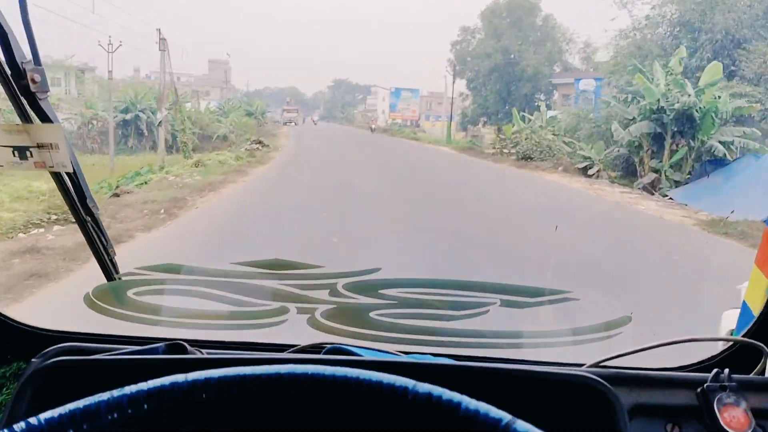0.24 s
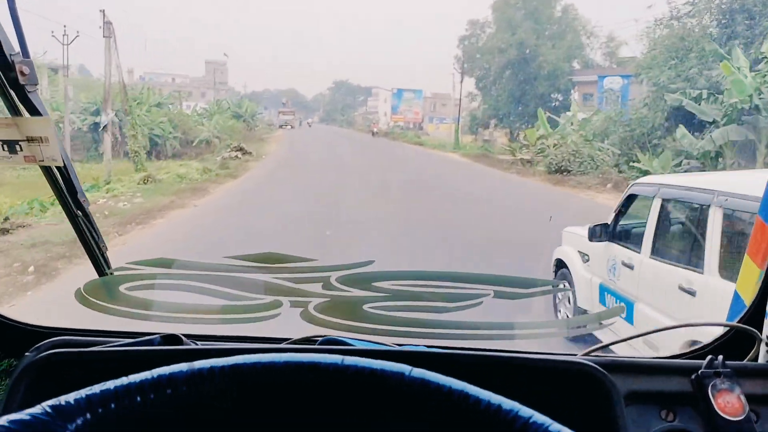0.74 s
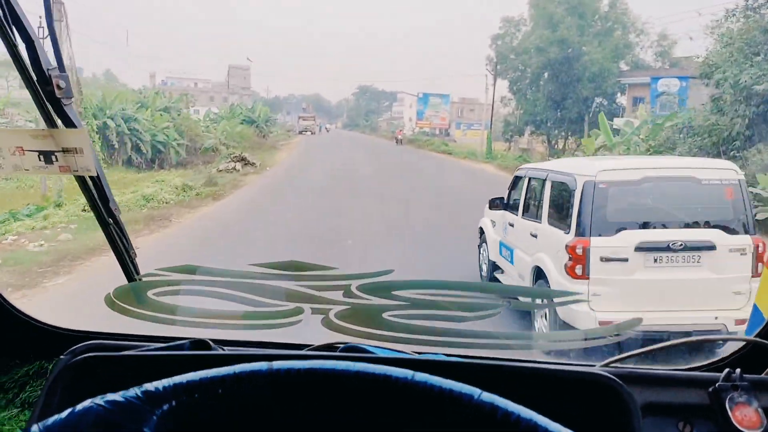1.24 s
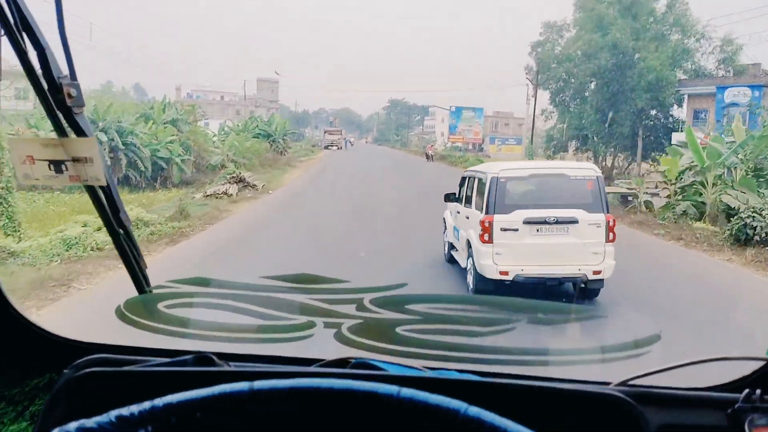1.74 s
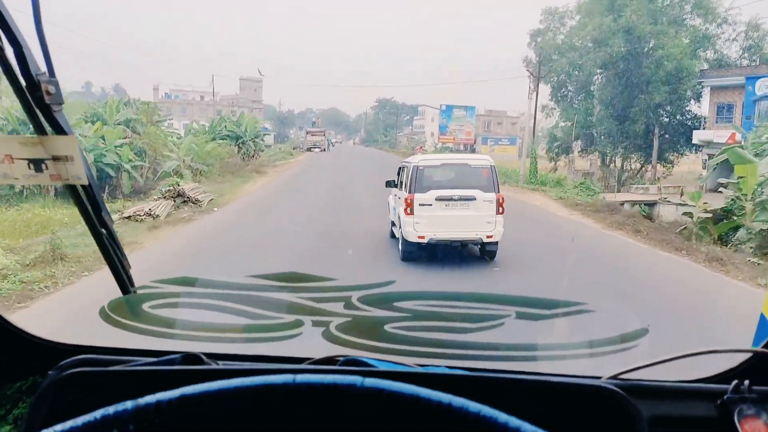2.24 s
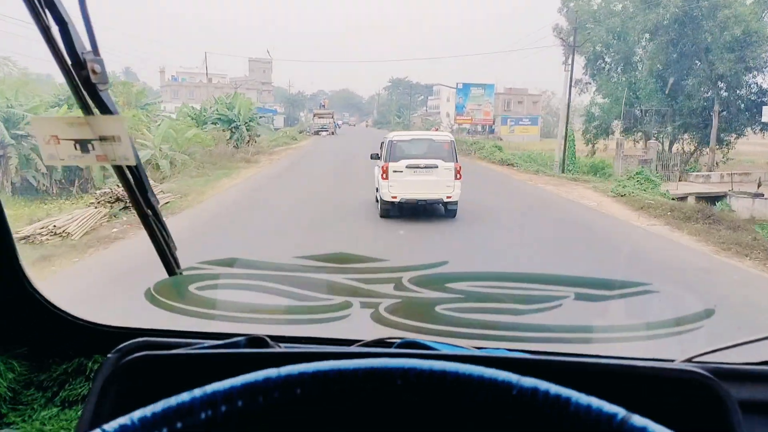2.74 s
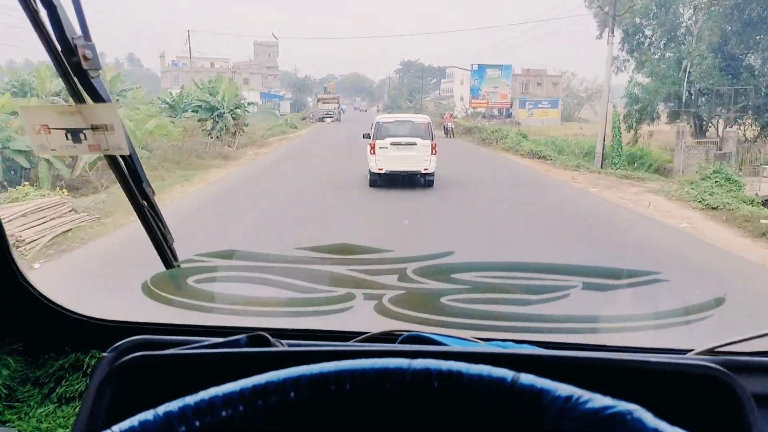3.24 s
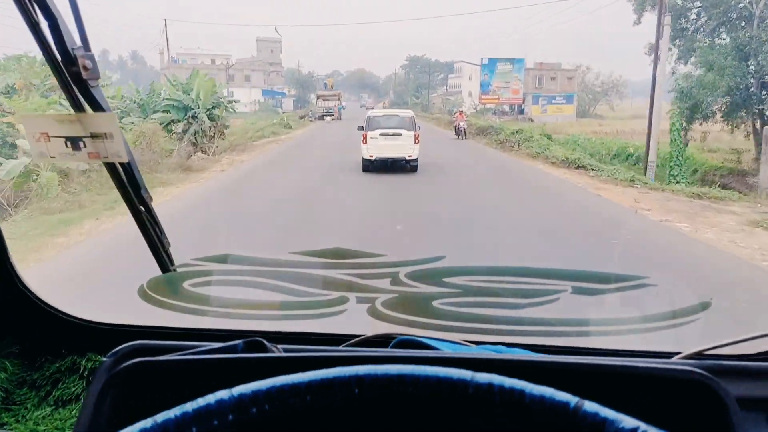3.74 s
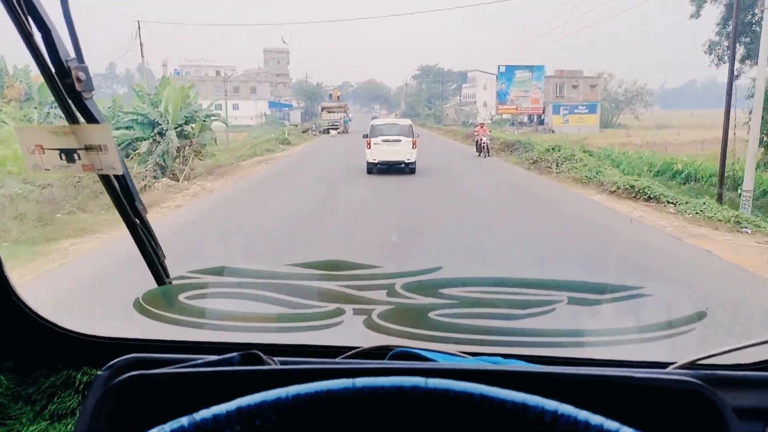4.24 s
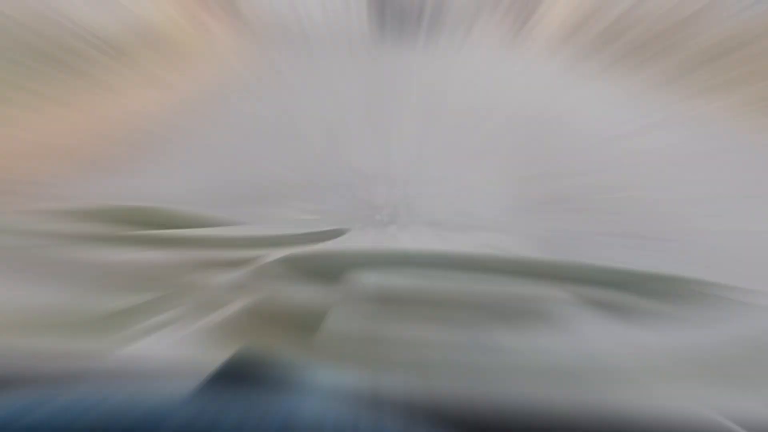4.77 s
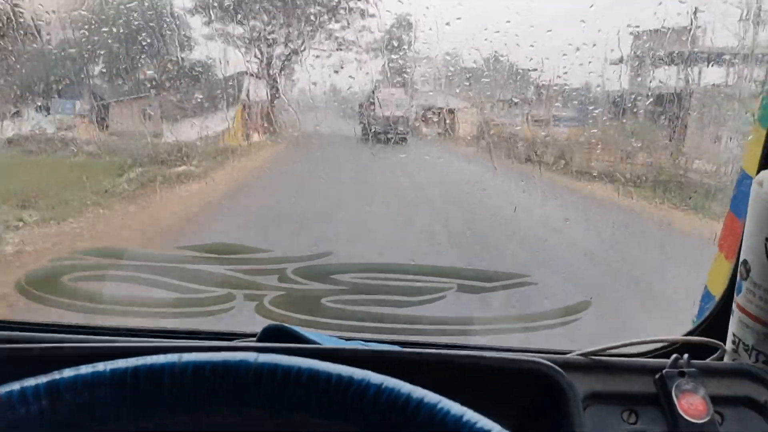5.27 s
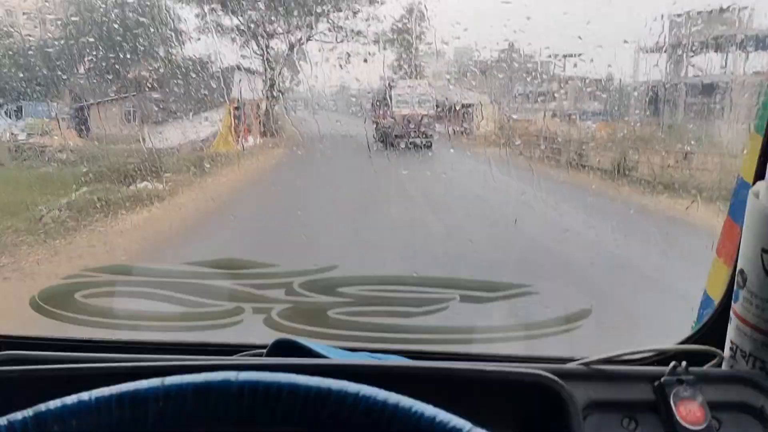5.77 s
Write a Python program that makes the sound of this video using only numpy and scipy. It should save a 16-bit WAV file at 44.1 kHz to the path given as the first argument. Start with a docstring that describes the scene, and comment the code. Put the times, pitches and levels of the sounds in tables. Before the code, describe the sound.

Low engine drone and bassy road noise fill a moving truck's cab while fittings jingle at every jolt; sound drops out for half a second near the end.

```python
"""A rough hum and rattle inside the cab of a truck cruising at steady revs.
Road rumble, boom and roar are shaped noise; the engine is a set of sine tones locked to the crankshaft.
Loose metal fittings on the right rattle in bursts at every jolt: random knocks make them ring and tick.
Near the end the sound drops out for half a second and returns a little louder, the engine slightly slower."""
import sys
import numpy as np
from scipy import signal
from scipy.fft import rfft, irfft, next_fast_len
from scipy.io import wavfile
from scipy.ndimage import uniform_filter1d

SR = 44100
rng = np.random.default_rng(int(sys.argv[2]) if len(sys.argv) > 2 else 0)


def put_to_file(sound):
    """Save the sound as 16-bit audio at rate SR, in the file named by the first command-line argument."""
    columns = np.atleast_2d(sound).T  # one column per channel
    safe = np.clip(columns, -1, 1)
    whole_steps = np.round(safe * 32767)
    wavfile.write(sys.argv[1], SR, whole_steps.astype(np.int16))


N = 264996

# Level of the road rumble over time: time_s, level_db
RUMBLE_LEVEL = [(0, -19.5), (.32, -20), (.55, -21), (.85, -14.5), (1.0, -21), (1.5, -28), (1.93, -18),
                (2.12, -24), (2.6, -26), (2.72, -17), (2.89, -24), (3.0, -23), (3.12, -22), (3.2, -22),
                (3.5, -20), (3.65, -26), (4.1, -18.5), (4.3, -17.5), (4.41, -28.5), (4.5, -17.5),
                (4.6, -21), (4.82, -25), (4.95, -17.5), (5.51, -17), (5.6, -17), (5.75, -32), (6.0, -26)]
# Level of the road roar, also followed by the boom: time_s, level_db
ROAR_LEVEL = [(0, -23), (.3, -22), (.8, -22.5), (1.45, -25), (2.2, -23.5), (3.0, -23.5), (3.9, -24),
              (4.25, -23), (4.95, -24), (5.51, -19), (5.7, -19.5), (6.0, -21)]
# Noise colours, in relative level: pitch_hz, level_db (per Hz)
RUMBLE_COLOUR = [(6, -28.5), (17, -1), (24, 6), (33, 9.5), (44, 0.5), (54, -9.5), (75, -32), (300, -100)]
BOOM_COLOUR = [(10, -56.5), (35, -23), (55, 2), (75, 5), (115, 5.5), (150, 6.5), (180, -1.5), (195, -13),
               (260, -34), (1000, -87)]
ROAR_COLOUR = [(60, -50.5), (130, -14.5), (200, 0), (330, -3), (520, -14), (820, -12.5), (1500, -13.5),
               (1700, -12), (3000, -15.5), (5000, -26), (7000, -30.5), (9000, -37), (16000, -41.5)]
CLATTER_COLOUR = [(500, -61), (1200, -19.5), (2000, 4.5), (3000, -5.5), (3500, -3.5), (5500, 0.5),
                  (6500, -2.5), (7300, -13), (8500, -28), (12000, -56)]
TICKING_COLOUR = [(3000, -47), (5500, -19.5), (7500, 1), (8700, 2.5), (9800, -2), (11500, -2), (13200, -1),
                  (14500, -13.5), (15700, -6)]
# Air and panel resonances of the cab: pitch_hz, width_hz, lift_db (negative is a dip)
CAB_RESONANCES = [(343, 25, -7), (441, 82, 11), (636, 152, 8.5), (830, 53, -3.5), (987, 190, 7.5),
                  (1263, 237, 6.5), (1432, 59, 7)]
# How alike left and right are: pitch_hz, likeness (1 same, 0 unrelated, -1 opposite)
LIKENESS = [(20, 0.98), (60, 1), (130, 0.94), (220, 0.87), (340, 0.88), (460, 0.86), (600, 0.42),
            (750, .25), (1100, -0.00069), (1500, -0.21), (3100, 0.071), (15000, -0.97)]
# Left level minus right level added by panning: pitch_hz, left_right_db
ROAR_PAN = [(200, -3.5), (380, 2), (700, -2.5), (1300, -1.5), (3000, -4.5)]
CLATTER_PAN = [(1500, -4), (2500, -9), (5000, -7), (8000, -3), (10000, -1), (15000, -.6)]
# Crankshaft speed: time_s, speed_turns_per_s
CRANK_SPEED = [(0, 19.72), (.5, 19.68), (.9, 19.76), (1.9, 19.82), (3.7, 19.84), (4.3, 19.75),
               (4.96, 19.73), (5.5, 19.3), (6.01, 19.3)]
# Engine and driveline orders: multiple (of crankshaft speed)
ORDER_MULTIPLE = [1, 3, 5, 6, 7, 8.23, 10, 12, 14, 16.5, 18, 21, 36]
# Average level of each order, one row per multiple: before_gap_db (rms), after_gap_db (rms)
ORDER_LEVEL = [(-36.5, -22), (-24, -20.5), (-37, -40), (-32.5, -43), (-20.5, -17), (-34.5, -25.5),
               (-45.5, -39), (-35.5, -57), (-42.5, -38.5), (-44, -37), (-43, -53), (-44.5, -44), (-45, -39)]
# Strength of the steady shaking between jolts: time_s, light_parts_db, heavy_parts_db, ticking_db
SHAKING = [(0, -26, -26, -45), (.3, -31, -28, -49), (.75, -24, -29, -44), (1.1, -30, -29, -47),
           (1.33, -38, -34, -58), (1.7, -38, -38, -55), (2.05, -36, -33, -60), (2.4, -31, -32, -51),
           (2.83, -31, -27, -52), (3.2, -32, -30, -52), (3.5, -29, -29, -48), (4.07, -31, -31, -52.5),
           (4.4, -26, -28, -45.5), (4.95, -30.5, -30, -49), (5.51, -34, -29, -54.5), (6.0, -35, -32, -51)]
# Peak strength of the shaking added by each jolt: start_s, light_parts_db, heavy_parts_db, ticking_db
JOLTS = [(0.0334, -23.5, -24.5, -42), (0.1114, -24, -30.5, -45.5), (0.1634, -37, -36, -44),
         (0.1944, -26.5, -34, -49), (0.2294, -28, -29, -51), (0.286, -18, -22.5, -44.5),
         (0.3464, -21, -25.5, -38.5), (0.3904, -25, -29.5, -39), (0.4354, -34.5, -34, -40.5),
         (0.5214, -25, -31, -45), (0.6004, -23, -27.5, -36.5), (0.6444, -28, -27, -40.5),
         (0.6834, -24.5, -26, -41.5), (0.7594, -27, -27.5, -42), (0.8154, -28, -26.5, -38),
         (0.8864, -27, -29, -47.5), (0.9774, -23, -35.5, -46.5), (1.0294, -30.5, -33, -45),
         (1.0644, -26, -28, -45), (1.1334, -27, -34, -41), (1.2004, -25, -33, -45),
         (1.2504, -28.5, -41, -50), (1.3614, -28, -31, -47), (1.3884, -29, -34, -43),
         (1.4354, -30, -41.5, -48), (1.5115, -24, -30, -44), (1.5744, -28.5, -27.5, -43),
         (1.6264, -25, -27.5, -46), (1.6614, -35, -30, -48), (1.7214, -29.5, -39, -51),
         (1.7514, -35.5, -31, -47), (1.8244, -22, -28, -42.5), (1.871, -25, -28, -41),
         (1.9144, -33, -33, -52), (1.9744, -32, -32, -57), (2.0294, -33, -33, -43.5),
         (2.1334, -20, -28, -40), (2.2054, -25.5, -24, -45), (2.2654, -27.5, -29, -44),
         (2.3204, -25, -26, -40), (2.3784, -27, -29, -46), (2.453, -26, -27, -43),
         (2.5074, -34, -36.5, -48), (2.5814, -28, -31, -46.5), (2.6254, -26.5, -29, -41),
         (2.7067, -28.5, -35, -47), (2.743, -24, -26, -43), (2.8584, -25.5, -28, -44),
         (2.945, -21, -25.5, -41), (2.997, -26, -31, -43), (3.041, -27, -29.5, -44),
         (3.0979, -27, -30.5, -45.5), (3.137, -25.5, -23, -41.5), (3.2167, -21, -18, -45),
         (3.2674, -31, -37, -44.5), (3.3014, -25.5, -27.5, -42), (3.3694, -27, -24, -43),
         (3.4104, -29.5, -30, -46.5), (3.4364, -22, -26.5, -44), (3.4894, -24.5, -27, -42.5),
         (3.5564, -25.5, -29, -42), (3.6044, -26.5, -34.5, -43.5), (3.68, -25.5, -29.5, -47.5),
         (3.7214, -24.5, -27.5, -40.5), (3.7594, -25, -27, -39), (3.808, -22.5, -28.5, -43),
         (3.866, -26.5, -29, -40), (3.935, -24.5, -28.5, -47), (3.9674, -28, -27.5, -40.5),
         (4.0094, -25, -33.5, -43.5), (4.1034, -21.5, -28.5, -39.5), (4.1454, -27.5, -30, -42.5),
         (4.1944, -24, -28.5, -42), (4.2424, -22.5, -26, -41), (4.2894, -20.5, -18, -40),
         (4.3654, -22, -24.5, -45), (4.4434, -28, -40, -42), (4.4904, -28, -28, -41.5),
         (4.5514, -26.5, -25, -45.5), (4.59, -24, -23, -39.5), (4.6494, -26.5, -27.5, -45.5),
         (4.7014, -31, -31, -48), (4.7464, -28, -28.5, -47.5), (4.7994, -29, -33, -45.5),
         (4.8514, -29.5, -36, -46), (4.9044, -21, -19.5, -41), (5.5034, -18.5, -23, -34),
         (5.5444, -30, -26, -47), (5.5774, -23, -31, -39), (5.6183, -30, -33, -52), (5.6444, -26, -33, -43),
         (5.6954, -29, -32, -45), (5.7914, -17.5, -24, -37), (5.8404, -21, -31, -41),
         (5.893, -20.5, -28, -40.5), (5.9604, -27, -32, -37.5)]
# Pings of a small part, strength before panning: start_s, peak_db, pitch_hz, t60_s (time to fade by 60 dB)
PINGS = [(.0498, -36, 7250, .07), (.939, -26.5, 7200, .06), (2.9542, -30, 7160, .065),
         (3.0983, -33, 7050, .06)]
# Ringing modes of the loose fittings: pitch_hz
FITTING_PITCH = [2170, 2350, 2435, 2550, 2660, 2810, 2960, 3170, 3430, 3650, 4200, 4380, 4670, 4780, 5060,
                 5260, 5620, 5850, 6200, 6560, 6850, 7880, 8180, 8520]
# How each mode rings, one row per pitch: level_db (relative), t60_s, left_right_db (added by panning)
FITTING_RING = [(-1.5, .025, -9), (-4, 0.033, -11.5), (3, 0.015, -14), (-2, 0.0062, -9.5),
                (-1, 0.09, -10.5), (-2, 0.018, -14.5), (-3.5, 0.019, -22), (-9.5, 0.046, -5),
                (-14, 0.026, -7), (-19.5, 0.06, -7), (-7, 0.036, -7.5), (-3, 0.12, -1),
                (-8.5, 0.062, -11.5), (-5.5, 0.0502, -4.5), (-10, 0.016, -13), (-6.5, 0.015, -15),
                (-10.5, 0.052, -11), (-11.5, .04, -1), (-21.5, .025, 0.5), (-20, 0.033, 0.5),
                (-18.5, .025, -5), (-27, .05, -0.5), (-22, .05, -7.5), (-18, 0.041, 1.5)]
# The silent gap: start_s, end_s
GAP = (4.957, 5.5055)

BOOM_OVER_ROAR_DB, RUMBLE_SWELL_DB = 2, 2
# loudness of each rattle layer for the same shaking (dB)
HEAVY_RING_DB, LIGHT_RING_DB, CLATTER_DB, TICKING_DB = -3, -4.5, -4, 3.5
HEAVY_RISE_S, LIGHT_RISE_S, HEAVY_FALL_S, LIGHT_FALL_S = 0.0045, .0025, 0.026, 0.032
LEFT_LAG_SAMPLES = 12
FITTING_DIRECT_SHARE = .2   # part of the left channel's rattle power that comes direct
CUTOFF_HZ = 15900


def amp(db):
    """Turn decibels into a gain."""
    return 10 ** (np.asarray(db) / 20)


def rms_one(x):
    """Scale a sound so that its rms is 1."""
    return x / np.sqrt(np.mean(x ** 2) + 1e-20)


def in_time(rows):
    """Join the points of each table column with straight lines, one value a sample."""
    time_s, *columns = np.transpose(rows)
    return [np.interp(np.arange(N) / SR, time_s, column) for column in columns]


def at_hz(points, hz):
    """Read a table between its points on a log-frequency axis."""
    point_hz, value = np.array(points).T
    return np.interp(np.log(hz), np.log(point_hz), value)


def drift(rate_hz):
    """Slow random wandering, spread 1: noise smoothed twice by a one-pole low-pass."""
    step = 40   # samples between the values computed
    r = np.exp(-2 * np.pi * rate_hz * step / SR)
    noise = rng.standard_normal(N // step + 2002)
    slow = signal.lfilter([1], [1, -2 * r, r * r], noise)[2000:]   # skip the filter's start
    return np.interp(np.arange(N) / step, np.arange(len(slow)), rms_one(slow))


def colour(x, gain):
    """Filter a sound by a gain given as a function of frequency."""
    size = next_fast_len(N)
    hz = np.linspace(1, SR / 2, size // 2 + 1)
    return irfft(rfft(x, size) * gain(hz), size)[..., :N]


def panned(x, pan):
    """Tilt left against right by a different amount at each frequency."""
    left = colour(x[0], lambda hz: amp(at_hz(pan, hz) / 2))
    right = colour(x[1], lambda hz: amp(-at_hz(pan, hz) / 2))
    return np.array([left, right])


def diffuse(spectrum, resonances=()):
    """Stereo noise, rms 1: left and right are alike in the bass and differ more in the treble."""
    def gain(hz):
        lift = sum(lift_db / (1 + (2 * (hz - f) / width) ** 2) for f, width, lift_db in resonances)
        return amp(at_hz(spectrum, hz) + lift)

    def likeness(hz):
        return np.clip(at_hz(LIKENESS, hz), -1, 1)

    mid, side = rng.standard_normal((2, N))
    mid = colour(mid, lambda hz: gain(hz) * np.sqrt(1 + likeness(hz)))
    side = colour(side, lambda hz: gain(hz) * np.sqrt(1 - likeness(hz)))
    return rms_one(np.array([mid + side, mid - side]))


def evened(x, window_s=0.042):
    """Flatten the slow swells of a narrow noise; rms 1."""
    power = uniform_filter1d(np.mean(x ** 2, axis=0), int(window_s * SR))
    return rms_one(x / (power + .05) ** .4)


def road_rumble():
    """The lowest noise from the road, heaving at random about its set level."""
    level_db = in_time(RUMBLE_LEVEL)[0] + RUMBLE_SWELL_DB * drift(4.4)
    return amp(level_db) * evened(diffuse(RUMBLE_COLOUR))


def road_boom():
    """Bass noise that follows the roar's level with a slight flutter."""
    level_db = in_time(ROAR_LEVEL)[0] + BOOM_OVER_ROAR_DB + 0.25 * drift(18)
    return amp(level_db) * diffuse(BOOM_COLOUR)


def road_roar():
    """Wide noise, raised or dipped around the cab's resonances."""
    (level_db,) = in_time(ROAR_LEVEL)
    return amp(level_db) * panned(diffuse(ROAR_COLOUR, CAB_RESONANCES), ROAR_PAN)


def engine():
    """Sines locked to the crankshaft, each wavering slightly in level and phase."""
    turns = np.cumsum(in_time(CRANK_SPEED)[0]) / SR
    later = np.arange(N) / SR > GAP[0]
    out = np.zeros(N)
    for multiple, (before_db, after_db) in zip(ORDER_MULTIPLE, ORDER_LEVEL):
        phase_turns = multiple * turns + rng.random() + .03 * drift(2.5)
        level_db = np.where(later, after_db, before_db) + 1.4 * drift(3)
        # a sine's peak is sqrt(2) times its rms
        out += np.sqrt(2) * amp(level_db) * np.sin(2 * np.pi * phase_turns)
    return out


def ring(clicks, hz, t60_s):
    """A resonator: each unit click starts a fading sine of height 1."""
    r, w = amp(-60 / (t60_s * SR)), 2 * np.pi * hz / SR
    return signal.lfilter([0, np.sin(w)], [1, -2 * r * np.cos(w), r * r], clicks + 1e-18)


def from_right(near, other, share):
    """The left hears a share of the direct sound late; the rest is scattered by the cab."""
    late = np.roll(near, LEFT_LAG_SAMPLES)
    left = np.sqrt(share) * late + np.sqrt(1 - share) * other
    return np.array([left, near])


def pings():
    """Short rings of a small part with a single mode, stronger on the right."""
    out = np.zeros(N)
    for start_s, peak_db, hz, t60_s in PINGS:
        click = amp(peak_db) * (np.arange(N) == int(start_s * SR))
        out += ring(click, hz, t60_s)
    return from_right(out, 0, share=1) * amp([[-4], [3]])


def burst(rise_s, fall_s):
    """The strength of shaking after one jolt, peak 1: a quick rise and an exponential fall."""
    after_s = np.arange(SR // 5) / SR
    shape = (1 - np.exp(-after_s / rise_s)) ** 2 * np.exp(-after_s / fall_s)
    return shape / shape.max()


def jolts():
    """Bursts of shaking for light parts, heavy parts and ticking; heavy parts start slower."""
    light, heavy = burst(LIGHT_RISE_S, LIGHT_FALL_S), burst(HEAVY_RISE_S, HEAVY_FALL_S)
    shape = np.array([light, heavy, light])
    out = np.zeros((3, N))
    for start_s, *peak_db in JOLTS:
        i = int(start_s * SR)
        out[:, i:i + shape.shape[1]] += (amp(peak_db)[:, None] * shape)[:, :N - i]
    return out


def knocks(per_s, uneven_db):
    """Two unrelated streams of random contacts of uneven strength; rms 1."""
    strength = amp(uneven_db * np.minimum(rng.exponential(1, (2, N)), 4))
    push_or_pull = rng.choice([-1, 1], (2, N))
    contact = rng.random((2, N)) < per_s / SR
    return rms_one(strength * push_or_pull * contact)


def clatter(envelope, spectrum, share):
    """The ticks of the contacts: coloured knocks without a pitch."""
    near, other = knocks(9000, uneven_db=1.5) * envelope
    ticks = colour(from_right(near, other, share), lambda hz: amp(at_hz(spectrum, hz)))
    return panned(ticks, CLATTER_PAN)


def fittings(heavy, light):
    """Knocks ring the metal's modes, which come and go; upper modes belong to light parts."""
    out = np.zeros((2, N))
    for hz, (level_db, t60_s, pan_db) in zip(FITTING_PITCH, FITTING_RING):
        patchy = amp(3.2 * drift(16))
        force = knocks(1500, uneven_db=3.0) * patchy * (heavy if hz < 4000 else light)
        # scale down long rings, which pile up more
        near, other = ring(force, hz, t60_s) / np.sqrt(t60_s * SR)
        stereo = from_right(near, other, FITTING_DIRECT_SHARE)
        out += amp(level_db) * stereo * amp([[pan_db / 2], [-pan_db / 2]])
    return out


def scene():
    """Add up the road, the engine and the rattles, all rattles driven by the same shaking."""
    road = road_rumble() + road_boom() + road_roar()
    light, heavy, ticking = amp(in_time(SHAKING)) + jolts()
    ticks = amp(CLATTER_DB) * clatter(light, CLATTER_COLOUR, share=0.15)
    fine_ticks = amp(TICKING_DB) * clatter(ticking, TICKING_COLOUR, share=0.17)
    rings = fittings(amp(HEAVY_RING_DB) * heavy, amp(LIGHT_RING_DB) * light)
    return road + engine() + pings() + ticks + fine_ticks + rings


def record(dry):
    """Round the peaks, drop to silence during the gap and cut the highest treble."""
    t = np.arange(N) / SR
    fade_out, fade_in = (GAP[0] - t) / 0.0006, (t - GAP[1]) / 0.00077
    live = np.clip(np.maximum(fade_out, fade_in), 0, 1)
    rounded = 1.5 * np.tanh(dry / 1.5)
    low_pass = signal.ellip(14, .3, 75, CUTOFF_HZ - 100, fs=SR, output="sos")
    return signal.sosfilt(low_pass, live * rounded)


dry = scene()
out = record(dry)
put_to_file(out)
```